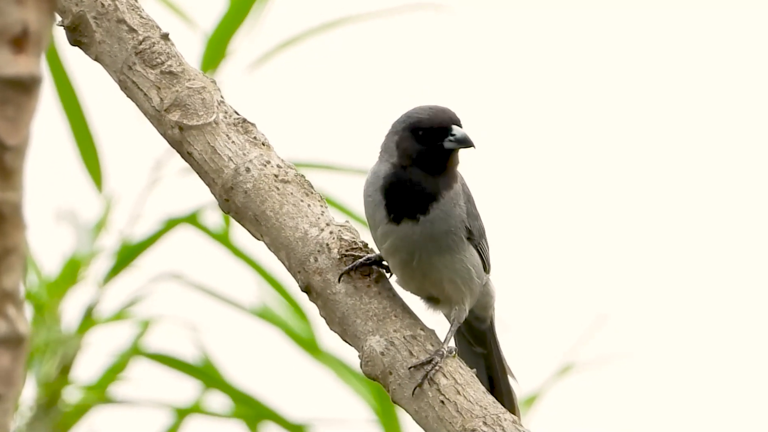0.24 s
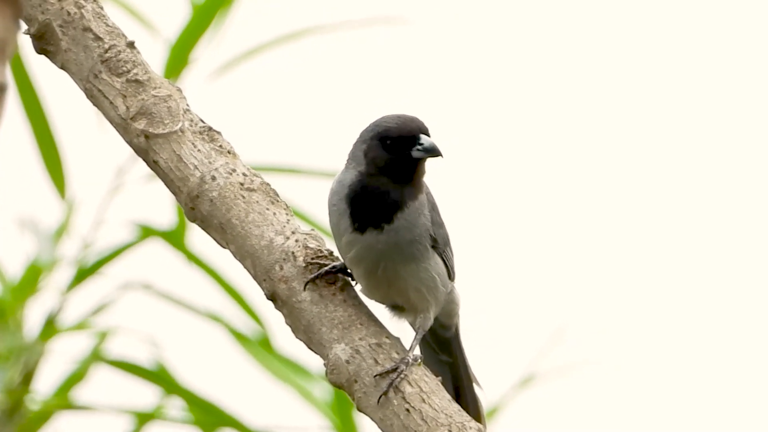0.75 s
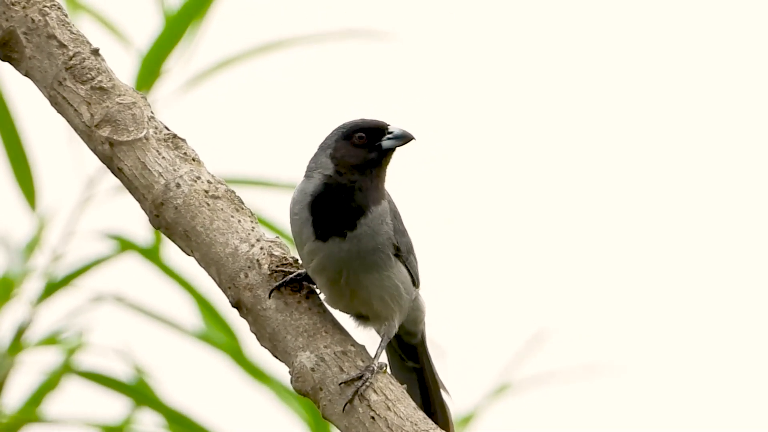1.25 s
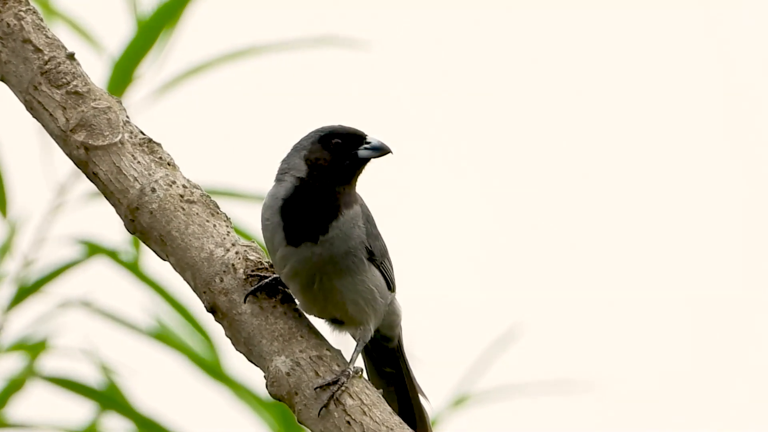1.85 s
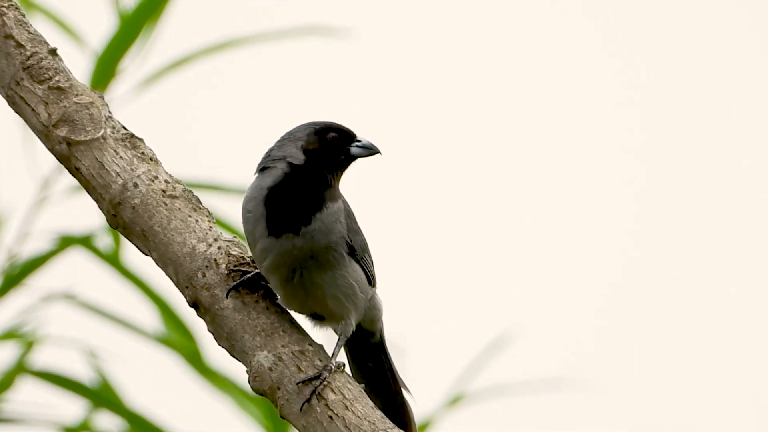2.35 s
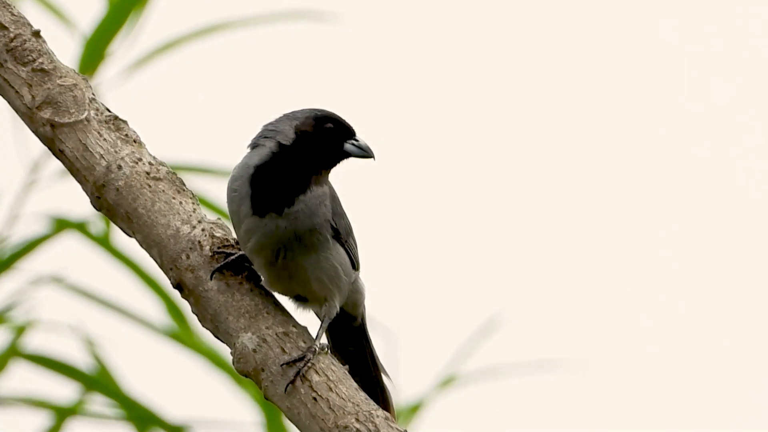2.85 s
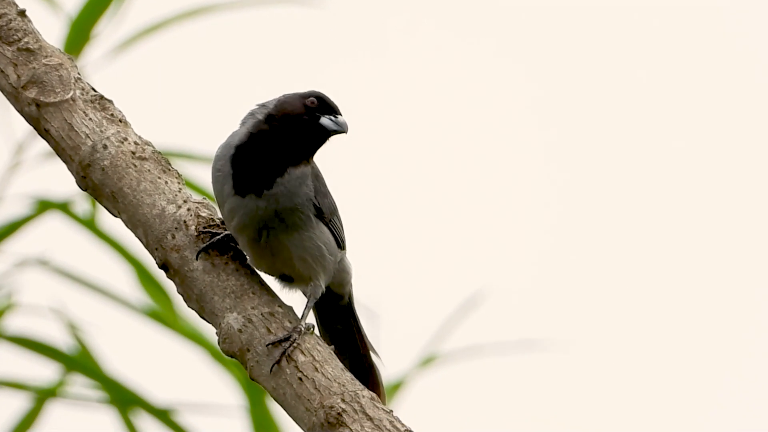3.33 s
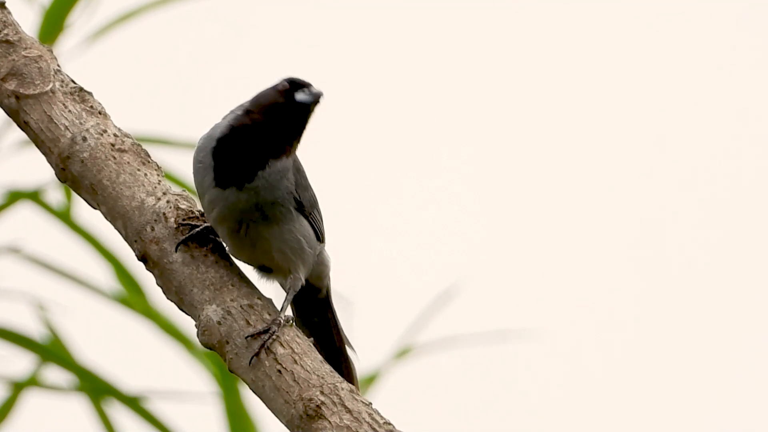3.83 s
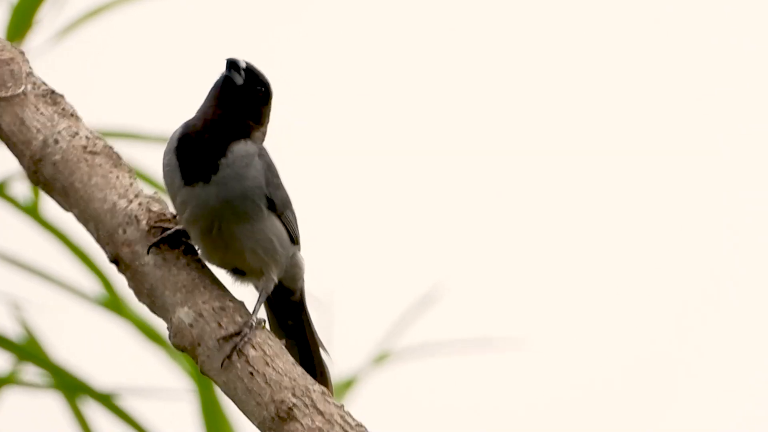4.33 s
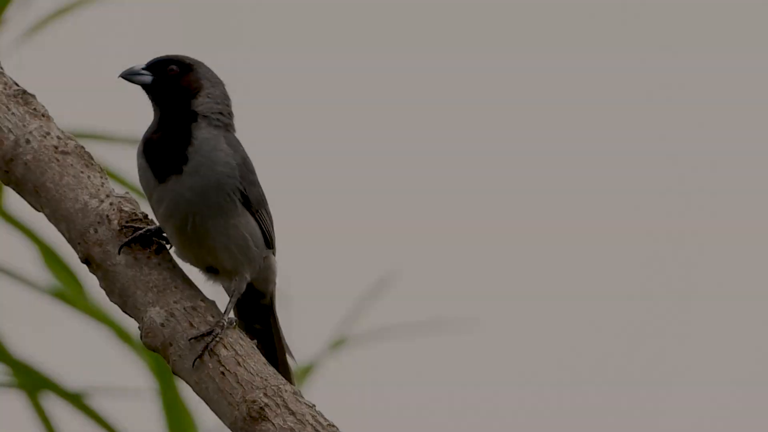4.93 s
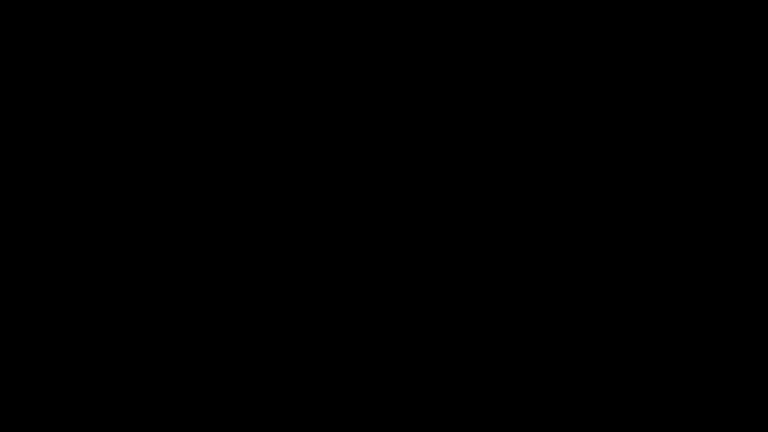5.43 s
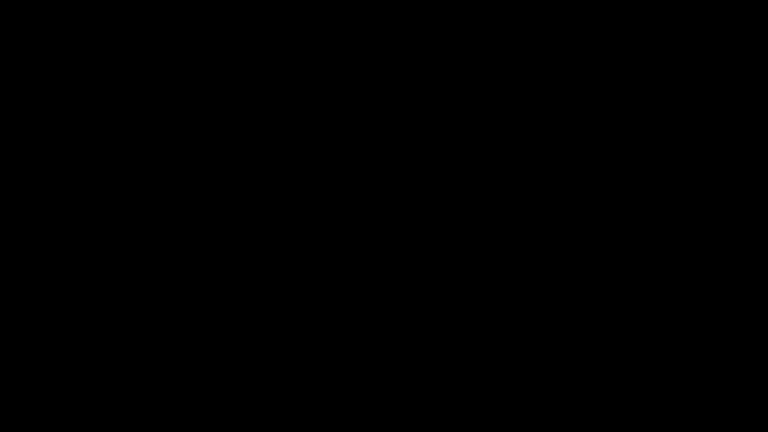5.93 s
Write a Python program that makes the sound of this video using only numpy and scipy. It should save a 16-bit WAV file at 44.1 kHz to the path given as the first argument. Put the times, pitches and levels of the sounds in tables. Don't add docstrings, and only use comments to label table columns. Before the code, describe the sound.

A small dark bird perched on a branch sings clear, rapid whistles, rising, falling and arching, close on the left with light reflections from trees. Before it comes a second of leafy hiss, twittering and crackly rustles, which return abruptly after the song. Faint rasping insects, dry ticks and distant bird trills sit to the right, then recede, leaving a hissier background and a faint falling whistle. Stereo outdoor pickup with little bass.

```python
import sys
import numpy as np
from scipy import signal
from scipy.fft import rfft, irfft, next_fast_len
from scipy.io import wavfile
from scipy.ndimage import uniform_filter1d

SR = 44100
rng = np.random.default_rng(int(sys.argv[2]) if len(sys.argv) > 2 else 0)


def how_loud(loudness_db):
    steps = np.asarray(loudness_db, float) / 20
    return 10 ** steps


def to_wav(s):
    ch = np.atleast_2d(s).T
    pcm = np.round(np.clip(ch, -1, 1) * 32767)
    wavfile.write(sys.argv[1], SR, pcm.astype(np.int16))


N = 272538
TIME = np.arange(N) / SR
BUSH_END_S, BUSH_BACK_S, PERCH_S = 1.233, 5.565, 5.692

# t/s, f/Hz, level/dB
RISE = [(0, 2150, -22), (.031, 2168, -12), (.055, 2160, -16), (.069, 2255, -9), (.095, 2450, -4),
        (.12, 2590, -8), (.143, 2804, -1), (.183, 3050, 0), (.203, 3200, -14)]
# t/s, f/Hz, level/dB
FALL = [(0, 2980, -21), (.045, 2680, -2), (.065, 2520, -2), (.1, 2390, -1), (.165, 2130, -9),
        (.215, 1975, -16), (.255, 1880, -22)]
# t/s, f/Hz, level/dB
ARCH = [(0, 1370, -30), (.02, 1890, -26), (.04, 2190, -12), (.06, 2407, -6), (.108, 2690, 0),
        (.185, 3026, -4), (.238, 3065, -4), (.295, 2805, -2), (.314, 2715, -24)]
# t/s, f/Hz, level/dB
CHIP = [(0, 1750, -23), (.031, 2055, -2.5), (.042, 2086, 0), (.055, 2030, -1), (.074, 1864, -9),
        (.096, 1775, -21)]
# t/s, f/Hz, level/dB
HOOK = [(0, 2720, -9), (.015, 2960, -8), (.022, 2990, -3), (.035, 2940, 0), (.06, 2650, -3),
        (.082, 2300, -22)]
# t/s, f/Hz, level/dB
SLUR = [(0, 2378, -14), (.037, 2385, -3), (.06, 2450, 0), (.099, 2502, 0), (.16, 2400, -1),
        (.189, 2258, -6), (.225, 2090, -11), (.247, 2000, -19)]
# t/s, f/Hz, level/dB
VEE = [(0, 3230, -11), (.012, 3540, -17), (.026, 3190, -7), (.038, 2810, -1), (.049, 2530, -1.5),
       (.057, 2570, -2), (.068, 2860, -1), (.08, 3150, -1.5), (.097, 3150, -10)]
# t/s, f/Hz, level/dB
LOOP = [(0, 2570, -2), (.013, 2805, -3), (.028, 2686, 0), (.038, 2323, -4), (.044, 1950, -21),
        (.058, 1760, -18), (.073, 2780, -2.5), (.09, 3020, -2), (.142, 3180, -2)]
# t/s, f/Hz, level/dB
DROP = [(0, 3040, -18), (.045, 2730, -4), (.071, 2556, -6), (.091, 2520, 0), (.109, 2450, -8),
        (.125, 2396, -2), (.157, 2212, -7), (.205, 2050, -13), (.215, 2027, -15)]
# t/s, f/Hz, level/dB
LIFT = [(0, 1950, -24), (.035, 1975, -7), (.092, 2212, 0), (.125, 2430, -8)]
# delay/s, spread/s, level/dB
ECHOES = [
    (.006, 0.0064, -8.5),
    (0.02, 0.01, -23.5),
    (.08, 0.046, -24.5),
]


def singer():
    # syllable, onset/s, end/s, level/dB, pitch ratio, contour skipped/s
    tune = [(RISE, 1.315, 1.518, -15.3, 1.001, 0), (DROP, 1.635, 1.85, -15.3, 1.001, 0),
            (ARCH, 2.025, 2.314, -11.8, .998, .02), (CHIP, 2.452, 2.545, -19.5, .999, 0),
            (HOOK, 2.595, 2.678, -11.5, 1.012, .003), (SLUR, 2.81, 3.02, -12.5, 1.022, .012),
            (VEE, 3.112, 3.21, -8.7, 1.03, 0), (LIFT, 3.34, 3.465, -13.3, 1.001, 0),
            (LOOP, 3.51, 3.655, -13.5, 1.001, 0), (FALL, 3.72, 3.975, -10.5, .999, 0),
            (ARCH, 4.11, 4.424, -9.5, 1.001, 0), (CHIP, 4.588, 4.686, -17, 1.001, 0),
            (HOOK, 4.731, 4.818, -9.5, .999, 0), (SLUR, 4.91, 5.159, -7.8, .999, 0),
            (VEE, 5.252, 5.35, -7.5, 1.004, .002)]
    # onset/s, length/s, first f/Hz, last f/Hz, level/dB
    grace_notes = [
        (4.11, .016, 2740, 3310, -33),
        (3.113, .022, 2720, 2850, -36),
    ]
    # f/Hz, density/dB per Hz
    wood_spectrum = [(100, -125), (400, -110), (1000, -91), (1500, -82), (2500, -76.5), (3300, -76.5),
                     (3600, -70.5), (3900, -80.5), (4500, -87.5), (6000, -98), (8000, -110), (10500, -135)]
    notes = sung(tune) + calls(grace_notes, 1, -6)
    song = whistle(notes, edge_s=.004, overtone_db=-32, waver_hz=8, swell_db=0)
    song = signal.sosfilt(signal.butter(20, 4300, fs=SR, output="sos"), song)
    echo = echoed(song, ECHOES, tail_db=-26.5, tail_t60=0.41) - song
    echo = signal.sosfilt(signal.butter(3, 2350, "high", fs=SR, output="sos"), echo)
    return song + echo + how_loud(2.4 * walk(8.2)) * coloured(wood_spectrum)


def sung(rows):
    notes = []
    for syllable, onset, end, level_db, ratio, skip in rows:
        s, hz, db = np.transpose(syllable)
        breath = onset + (s - s[0]) / (s[-1] - s[0]) * (end - onset)
        contour = onset + (s - skip) / (s[-1] - skip) * (end - onset)
        t = np.unique(np.clip(np.r_[breath, contour], onset, end))
        notes.append(np.c_[t, ratio * np.interp(t, contour, hz), level_db + np.interp(t, breath, db)])
    return notes


def calls(rows, sag, fade_db, rise_share=0):
    u = np.linspace(0, 1, num=8)
    notes = []
    for onset, length, first_hz, last_hz, db in rows:
        share = rise_share + (1 - rise_share) * u
        hz = last_hz + (first_hz - last_hz) * (1 - u) ** sag
        if rise_share > 0:
            share = np.r_[0, rise_share / 2, share]
            hz = np.r_[last_hz, last_hz + .7 * (first_hz - last_hz), hz]
        notes.append(np.c_[onset + length * share, hz, db + fade_db * (share - .5)])
    return notes


def whistle(notes, edge_s, overtone_db, waver_hz, swell_db):
    out = np.zeros(N)
    waver = waver_hz * walk(400)
    for note in notes:
        s, hz, db = np.transpose(note)
        span = slice(int(s[0] * SR), min(int(s[-1] * SR), N))
        t = TIME[span]
        pitch = uniform_filter1d(np.interp(t, s, hz), size=250, mode="nearest")
        pitch += waver[span] * (pitch / 3000) ** 2
        phase = 2 * np.pi * np.cumsum(pitch) / SR
        edge = np.clip(np.minimum(t - s[0], s[-1] - t) / edge_s, 0, 1)
        swell = swell_db * np.sin(np.pi * (t - s[0]) / (s[-1] - s[0]))
        envelope = np.sqrt(2) * how_loud(np.interp(t, s, db) + swell) * edge
        out[span] += envelope * (np.sin(phase) + how_loud(overtone_db) * np.sin(2 * phase))
    return out


def echoed(x, echoes, tail_db, tail_t60):
    t = TIME[:SR // 2]
    decay = np.exp(-np.log(1000) * t / tail_t60)
    shape = how_loud(tail_db) * decay * np.sqrt(2 * np.log(1000) / tail_t60 / SR)
    for delay, spread, db in echoes:
        clump = np.exp(-.5 * ((t - delay) / spread) ** 2)
        shape = shape + how_loud(db) * clump / np.sqrt(spread * SR * np.sqrt(np.pi))
    return x + signal.fftconvolve(x, shape * rng.standard_normal(len(t)))[:N]


def perch():
    # t/s, f/Hz, level/dB
    swoop = [(5.965, 3200, -45), (6.0, 2920, -28), (6.02, 2745, -35), (6.045, 2530, -37),
             (6.125, 1884, -47)]
    # t/s, f/Hz, level/dB
    swoop_octave = [(6.005, 5750, -58), (6.045, 5060, -54), (6.09, 4330, -49), (6.122, 3800, -52)]
    # onset/s, length/s, top f/Hz, last f/Hz, level/dB
    perch_arches = [(5.8, .09, 1983, 1790, -49), (4.69, .03, 3234, 2950, -62), (4.8, .03, 3575, 3380, -59),
                    (5.785, .035, 1230, 1120, -58), (5.977, .014, 4250, 4150, -52),
                    (5.83, .055, 4050, 3900, -60), (5.887, .014, 3350, 3250, -54)]
    notes = [swoop, swoop_octave] + calls(perch_arches, sag=.6, fade_db=-2.5, rise_share=.38)
    song = whistle(notes, edge_s=.008, overtone_db=-36, waver_hz=15, swell_db=3.5)
    return echoed(song, ECHOES, tail_db=-22.5, tail_t60=.4)


def bush():
    # onset/s, length/s, top f/Hz, last f/Hz, level/dB
    hook_calls = [
        (.035, .145, 2330, 1820, -40),
    ]
    # onset/s, length/s, first f/Hz, last f/Hz, level/dB
    fading_calls = [(.436, .2, 2400, 1680, -38.5), (.645, .025, 1940, 2000, -42),
                    (.145, .03, 4100, 4700, -43), (.163, .04, 3850, 3700, -40), (0, .08, 5400, 5040, -37),
                    (0, .07, 3900, 3830, -35), (.915, .02, 2600, 4200, -40), (.905, .02, 4950, 4800, -47),
                    (5.674, .026, 7950, 8400, -50), (5.84, .025, 5500, 4300, -47),
                    (5.775, .05, 2900, 2600, -41), (5.915, .075, 5000, 2980, -44),
                    (6.095, .04, 2650, 2590, -44), (5.565, .022, 4640, 4690, -41),
                    (5.6, .03, 4850, 4300, -46), (6.075, .055, 1716, 1955, -46),
                    (5.825, .025, 3800, 3760, -47), (6.11, .032, 3660, 3720, -41),
                    (5.764, .012, 3400, 3250, -36), (5.782, .02, 4200, 4350, -42),
                    (5.812, .012, 1750, 1700, -43), (5.708, .012, 2250, 2200, -46),
                    (5.874, .018, 2500, 4000, -43), (5.875, .03, 1800, 1780, -47),
                    (6.018, .025, 1680, 1720, -46), (5.946, .01, 5750, 5750, -47)]
    # onset/s, length/s, first f/Hz, last f/Hz, level/dB
    swelling_calls = [(.32, .115, 5800, 6660, -38), (.385, .07, 7570, 8900, -36),
                      (.42, .02, 7620, 8350, -34), (.79, .055, 1810, 2074, -48),
                      (.42, .022, 1900, 2750, -39), (1.14, .06, 1700, 2056, -45),
                      (5.65, .06, 1610, 1980, -46), (5.65, .08, 3480, 4880, -48),
                      (5.735, .035, 4500, 3500, -44), (6.03, .04, 4850, 4550, -50),
                      (6.06, .04, 2800, 3120, -43), (6.148, .032, 3950, 2720, -42),
                      (6.13, .05, 5610, 4410, -46), (.885, .06, 5750, 6120, -50),
                      (1.1, .08, 2850, 2880, -50), (5.97, .03, 4800, 4580, -43),
                      (5.565, .015, 3640, 4140, -38), (.2, .25, 581, 575, -56),
                      (5.89, .026, 4450, 4620, -47)]
    # f/Hz, density/dB per Hz
    bush_spectrum = [(30, -107), (80, -86), (220, -90.5), (450, -79), (1300, -84.5), (1700, -72),
                     (3000, -77), (4600, -79), (6100, -77.5), (8200, -83.5), (9100, -79), (9700, -101),
                     (11000, -100), (15000, -106)]
    # t/s, level/dB, centre f/Hz, width/Hz, decay/s
    rustle_rows = [(0, -24, 4700, 2060, 0.04), (.003, -15.5, 4800, 2200, .007),
                   (.021, -25, 4500, 2200, .015), (.145, -32, 5200, 1800, 0.02),
                   (.655, -39, 1600, 1200, 0.0065), (.92, -34, 3900, 1400, .012),
                   (1.215, -31, 5500, 2480, 0.025), (5.565, -30, 4400, 3000, 0.014),
                   (5.752, -37, 2500, 2500, .005), (5.76, -28, 3900, 1800, .004),
                   (5.766, -29, 3500, 1600, .006), (5.784, -24.5, 3400, 3000, .004),
                   (5.793, -27, 3500, 2200, .005), (5.812, -33, 2500, 2000, .006),
                   (5.846, -33, 3000, 2500, .003), (5.874, -30, 2700, 2000, .004),
                   (5.882, -35, 3200, 2000, .005)]
    chatter = calls(hook_calls, sag=2.2, fade_db=-10, rise_share=.14)
    chatter = chatter + calls(fading_calls, sag=2.1, fade_db=-10)
    chatter = chatter + calls(swelling_calls, sag=1.5, fade_db=4)
    chatter = chatter + flock(count=400, db=-51)
    twitter = whistle(chatter, edge_s=0.0016, overtone_db=-21.5, waver_hz=39.4, swell_db=2.5)
    twitter = echoed(twitter, [(.012, 0.0062, -9.5)], tail_db=-9, tail_t60=0.35)
    hiss = how_loud(1.1 * walk(14)) * coloured(bush_spectrum)
    rustles = sum(rustle(*row) for row in rustle_rows)
    slow_katydid = how_loud(-49.5) * throb(51, 0.28, 0.14) * band(9200, 450)
    return hiss + twitter + rustles + slow_katydid


def flock(count, db):
    notes = []
    for when, pitch, slope, length, size in rng.random((count, 5)):
        s, hz = when * N / SR, 1750 * 3.2 ** pitch
        if not BUSH_END_S < s < BUSH_BACK_S - .1:
            level_db = db - 8 * size
            end_s, end_hz = s + .03 + .07 * length, hz * (.7 + .5 * slope)
            notes.append([(s, hz, level_db), (end_s, end_hz, level_db)])
    return notes


def rustle(s, db, hz, width_hz, decay):
    t = TIME[:SR // 4]
    bell = np.exp(-.5 * ((np.fft.rfftfreq(len(t), 1 / SR) - hz) / (width_hz / 2)) ** 2)
    noise = unit(irfft(rfft(rng.standard_normal(len(t))) * bell, len(t)))
    burst = how_loud(db) * noise * np.exp(-t / decay)
    return np.r_[np.zeros(int(s * SR)), burst, np.zeros(N)][:N]


def meadow():
    # onset/s, length/s, first f/Hz, last f/Hz, level/dB
    far_glides = [(.07, .06, 4950, 4780, -48), (.28, .07, 4940, 4740, -48), (.42, .1, 6400, 5520, -54.5),
                  (.845, .02, 8120, 8170, -51), (3.85, .014, 7900, 7960, -48), (.575, .03, 5250, 5280, -56),
                  (.645, .035, 2420, 2330, -55), (1.715, .025, 4230, 4300, -55),
                  (1.755, .055, 4450, 4900, -52)]
    # onset/s, length/s, top f/Hz, last f/Hz, level/dB
    far_arches = [(1.09, .02, 3700, 3200, -53), (1.68, .025, 3780, 3200, -48),
                  (2.04, .025, 8600, 8390, -55), (2.9, .025, 8650, 8550, -48)]
    # t/s, f/Hz, level/dB
    far_phrases = [
        [(.665, 6480, -55), (.72, 6640, -56), (.765, 6600, -56), (.8, 6150, -63), (.84, 5900, -58),
         (.865, 5690, -50), (.887, 5690, -49)],
        [(.972, 5450, -54), (1.0, 5100, -53), (1.015, 5040, -53), (1.032, 5100, -53), (1.046, 4100, -58),
         (1.07, 3700, -59)],
        [(1.425, 5600, -60), (1.45, 5500, -54), (1.49, 5500, -56), (1.52, 5600, -62), (1.55, 5770, -63),
         (1.602, 5800, -56)],
        [(1.11, 2450, -56), (1.137, 3350, -56), (1.15, 3460, -56), (1.168, 3400, -55), (1.19, 3050, -55)],
        [(1.71, 2750, -56), (1.74, 3430, -55), (1.765, 3380, -54), (1.785, 3000, -52)],
    ]
    # onset/s, length/s, first f/Hz, last f/Hz, level/dB
    buzz_calls = [(0, .25, 2650, 2396, -45), (0, .17, 3180, 2950, -47.5), (0, .18, 1313, 1255, -55),
                  (.36, .26, 2550, 2390, -51), (.36, .16, 2930, 3160, -46), (.74, .28, 3070, 2400, -52),
                  (.735, .285, 3610, 2890, -49), (1.31, .29, 3070, 2340, -49), (1.38, .18, 3240, 2900, -56)]
    # f/Hz, density/dB per Hz
    leaf_spectrum = [(100, -25), (1500, -4), (2200, 1), (3500, 0.5), (5500, 2.5), (6700, 0.5), (7600, -9),
                     (9000, -8), (10000, -16.5), (12000, -11), (14000, -15), (15600, -26)]
    # f/Hz, density/dB per Hz
    meadow_spectrum = [(30, -102), (80, -97), (300, -94.5), (1000, -97), (2000, -90.5), (3000, -99),
                       (5600, -101), (6900, -94), (7600, -101), (9500, -95), (10300, -102), (10600, -135)]
    trill_s = np.r_[1.849, 1.909, 1.966 + .0504 * np.arange(15)]
    leaf_db, lag_samples = -48, 1

    strangers = calls(far_glides, sag=1.2, fade_db=4)
    strangers = strangers + calls(far_arches, sag=.6, fade_db=1.5, rise_share=.42) + far_phrases
    far = whistle(strangers, edge_s=.004, overtone_db=-40, waver_hz=4, swell_db=5)
    trill = pips(trill_s, -47.5, -45, -49.5, 3750, 2950, .007)
    far += whistle(trill, edge_s=0.0028, overtone_db=-44, waver_hz=30, swell_db=11)
    buzzer = calls(buzz_calls, sag=1.8, fade_db=-2.5)
    buzzer = whistle(buzzer, edge_s=.01, overtone_db=-34, waver_hz=155, swell_db=-0.5)
    far += (.5 + throb(116, 0, .2)) * buzzer
    far = echoed(far, [(.015, .008, -24)], tail_db=-8.5, tail_t60=.3)
    chorus, strokes = insects()
    leaves = [how_loud(leaf_db + receding() + 0.87 * walk(12)) * unit(coloured(leaf_spectrum)) for _ in range(2)]

    left = how_loud(-4) * np.roll(chorus, lag_samples) + how_loud(-1.5) * far
    left = echoed(np.roll(left, lag_samples), [(.002, .001, -5)], tail_db=-6, tail_t60=.06)
    left += how_loud(-0.6) * np.roll(strokes, lag_samples)
    left = left + leaves[0] + coloured(meadow_spectrum)
    right = chorus + strokes + far + leaves[1] + coloured(meadow_spectrum)
    return left, right


def pips(times, first_db, top_db, last_db, from_hz, to_hz, half_s):
    level = np.interp(np.linspace(0, 2, len(times)), range(3), [first_db, top_db, last_db])
    return [[(s - half_s, from_hz, db), (s + half_s, to_hz, db)] for s, db in zip(times, level)]


def insects():
    # t/s, level/dB
    surges = [
        (0, 6),
        (.45, 2),
        (.63, 4),
        (1.31, 9),
        (1.8, 5),
        (2.2, 3),
        (3, 6),
        (3.6, 8),
        (3.8, 4),
        (4.25, 7),
    ]
    chirp_s = np.r_[1.06 + .0513 * np.arange(16), 1.877 + .0502 * np.arange(16)]
    cicada_db, surge_s = -49, .1
    surge_db = sum(db * np.exp(-.5 * ((TIME - s) / surge_s) ** 2) for s, db in surges)
    buzz = unit((1.0 + throb(129, 0, 0.2)) * band(4634, 600))
    cicada = how_loud(cicada_db + .9 * receding() + surge_db + 2.3 * walk(23)) * buzz
    strokes = katydid()
    far_cricket = how_loud(-68.5) * throb(43, 0, 0.18) * band(6950, 500)
    chirps = pips(chirp_s, -58, -54, -52, 6830, 6790, .011)
    chirps = whistle(chirps, edge_s=.003, overtone_db=-60, waver_hz=10, swell_db=5)
    return cicada + far_cricket + chirps, strokes


def katydid():
    # t/s, lag/cycles
    late = [(0, -.04), (1.2, .22), (2.5, .38), (4.4, .72), (6.2, .86)]
    rate_hz, top_hz, sag_hz = 68.55, 9520, 860
    stroke_share, stroke_db = .31, -53
    place = (TIME * rate_hz - np.interp(TIME, *np.transpose(late)) + .55) % 1 - .5
    hz = top_hz - sag_hz * np.sin(np.pi * place / .54) ** 2 + 50 * band(0, 300)
    gate = np.clip((stroke_share - np.abs(place)) / .07, 0, 1)
    quiet = np.interp(TIME, [5.8, 6.0], [1, .3])
    level = how_loud(stroke_db + 1.6 * band(0, 200) - 5 * place)
    return level * gate * quiet * np.sin(2 * np.pi * np.cumsum(hz) / SR)


def ticks():
    # t/s, level/dB
    tick_rows = [(.193, -44), (.494, -46), (.755, -49), (.944, -46), (1.395, -50), (1.65, -51), (1.9, -49),
                 (2.33, -51), (3.3, -51), (3.56, -48), (3.62, -47), (3.9, -50), (4.186, -46)]
    strikes = sum(how_loud(db) * (TIME >= s) * np.exp(-np.abs(TIME - s) / .004) for s, db in tick_rows)
    whine = how_loud(-62 + receding() + 3 * walk(9)) * band(6550, 110)
    return strikes * band(6800, 1500) + whine


def receding():
    # t/s, level/dB
    chorus_level = [(0, 2), (1.2, 1.5), (1.4, -1), (4.25, -1), (4.55, -7), (4.8, -17), (5, -34)]
    return np.interp(TIME, *np.transpose(chorus_level))


def unit(x):
    return x / np.sqrt(np.mean(x ** 2))


def coloured(spectrum):
    hz, db = np.transpose(spectrum)
    size = next_fast_len(N)
    gain = how_loud(np.interp(np.log(np.fft.rfftfreq(size, 1 / SR) + 1), np.log(hz), db))
    return irfft(rfft(rng.standard_normal(size)) * gain, size)[:N] * np.sqrt(SR / 2)


def band(hz, width_hz):
    size = next_fast_len(N)
    bell = np.exp(-.5 * ((np.fft.rfftfreq(size, 1 / SR) - hz) / (width_hz / 2)) ** 2)
    return unit(irfft(rfft(rng.standard_normal(size)) * bell, size)[:N])


def walk(rate):
    k = int(SR / rate)
    held = np.repeat(rng.standard_normal(N // k + 1), k)
    return uniform_filter1d(uniform_filter1d(held, k), k)[:N]


def throb(rate_hz, centre, width):
    return np.exp(-.5 * (((TIME * rate_hz - centre + .5) % 1 - .5) / width) ** 2)


def scene():
    # f/Hz, density/dB per Hz
    perch_spectrum = [(200, -125), (700, -104), (1200, -97), (2500, -87), (3600, -83), (4500, -88.5),
                      (7000, -87.5), (8000, -92), (11000, -93), (15500, -93.5)]
    left, right = meadow()
    in_wood = (TIME >= BUSH_END_S) & (TIME < BUSH_BACK_S)
    left = signal.sosfiltfilt(signal.butter(3, 3700, "high", fs=SR, output="sos"), left)
    left = left + np.where(in_wood, singer(), bush())
    thin = signal.sosfilt(signal.butter(4, 1200, "high", fs=SR, output="sos"), right)
    right = np.where(TIME < PERCH_S, right, thin + coloured(perch_spectrum)) + perch()
    return np.array([left, right]) + how_loud([[-5], [0]]) * ticks()


def roll_off(x):
    return signal.sosfilt(signal.butter(12, 15630, fs=SR, output="sos"), x)


def record(dry):
    return roll_off(dry)


dry = scene()
out = record(dry)
to_wav(out)
```